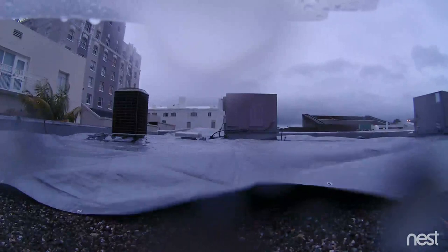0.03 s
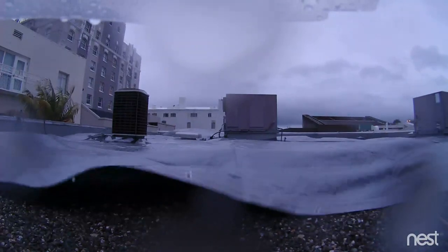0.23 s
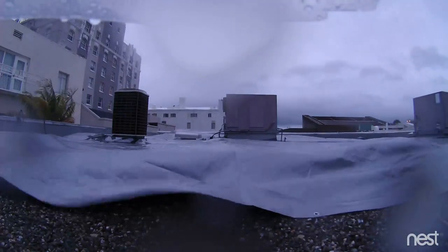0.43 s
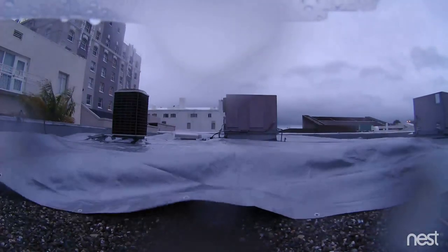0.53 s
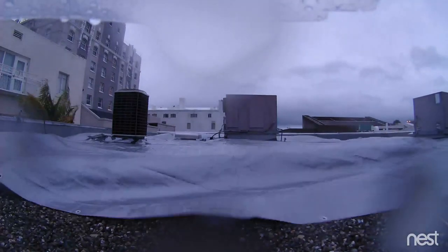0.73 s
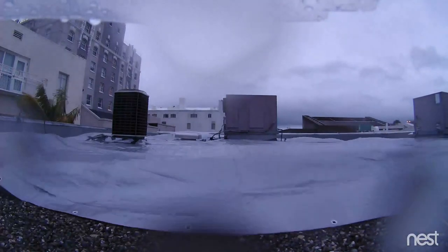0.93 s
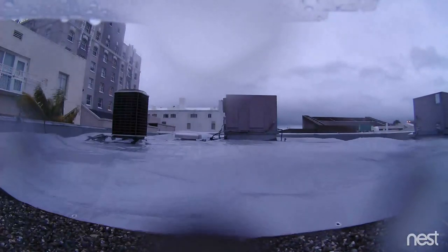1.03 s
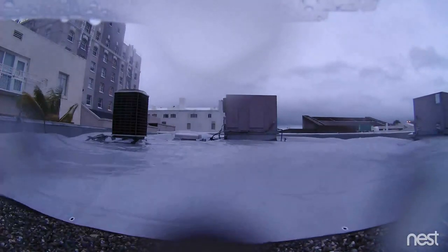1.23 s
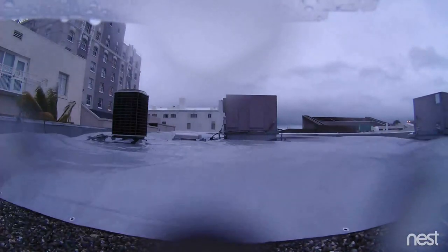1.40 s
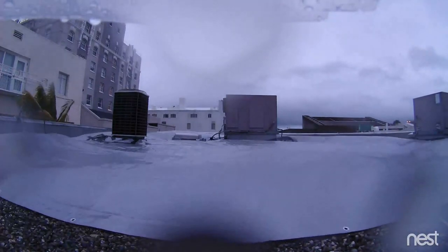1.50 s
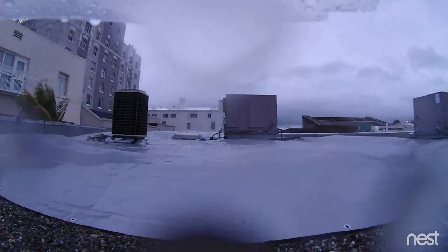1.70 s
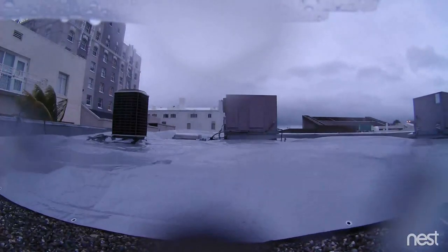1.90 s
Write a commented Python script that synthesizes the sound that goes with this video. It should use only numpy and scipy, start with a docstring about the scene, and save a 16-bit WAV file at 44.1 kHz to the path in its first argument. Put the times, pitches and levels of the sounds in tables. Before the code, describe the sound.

A large tarp flaps close by on a rooftop, with its loudest cluster of snaps from about 0.1 to 0.3 seconds. A second burst comes around 0.5 seconds, followed by lighter flaps until 0.9 and one more near 1.15. After 1.3 seconds it only flutters softly. Quieter gusty wind hisses and rumbles on the microphone throughout, with a few faint spatters.

```python
"""On a gravel roof, a large tarp billows in gusty, wet wind, close to a small outdoor camera.
Each flap is a swell of tiny crease pops that ring the sheet, with a louder snap where it pulls taut;
between flaps it flutters softly. The parapet and roof boxes return a short, dull echo.
Turbulent wind roars and hisses over the roofs and buffets the microphone; light spatters land nearby."""
import sys
import numpy as np
from scipy import signal
from scipy.fft import rfft, irfft
from scipy.io import wavfile
from scipy.ndimage import uniform_filter1d

SR = 44100
rng = np.random.default_rng(int(sys.argv[2]) if len(sys.argv) > 2 else 0)


def bounce(signal):
    """Save signal as a 16-bit WAV file at the path given by the first command-line argument."""
    frames = np.transpose(np.atleast_2d(signal))
    limited = np.clip(frames, -1, 1)
    pcm = np.round(limited * 32767).astype(np.int16)
    wavfile.write(sys.argv[1], SR, pcm)


N = 85995


def amp(db):
    """Amplitude ratio of a level in decibels."""
    return 10 ** (np.asarray(db) / 20)


def unit_rms(x):
    """Normalisation to unit mean power."""
    return x / np.sqrt(np.mean(x ** 2) + 1e-20)


def spectrum_db(points, hz):
    """Spectral level, interpolated on a logarithmic frequency axis."""
    f, db = np.transpose(points)
    return np.interp(np.log(hz + 1), np.log(f), db)


def envelope(rows, column=1):
    """Amplitude envelope from levels interpolated in time."""
    rows = np.array(rows)
    return amp(np.interp(np.arange(N) / SR, rows[:, 0], rows[:, column]))


def add(mix, onset, sound):
    """Superposition of a sound on the mix, from an onset in seconds."""
    start = round(onset * SR)
    part = mix[max(start, 0):max(start + len(sound), 0)]
    part += sound[max(-start, 0):][:len(part)]


def swell(peak, rise, fall, shape=1.78):
    """Growth and decay about a peak; rise and fall are the times between it and 1/e amplitude."""
    t = np.arange(N) / SR - peak
    return np.exp(-np.maximum(-t / max(rise, 1e-3), t / max(fall, 1e-3)) ** shape)


def crackle(clicks_per_s=1300, spread_db=2.5, air_gain=0.56):
    """Shot noise: independent clicks of uneven size, over the white noise of rushing air."""
    sizes = amp(spread_db * np.minimum(rng.exponential(1, N), 3)) * rng.choice([-1, 1], N)
    clicks = sizes * (rng.random(N) < clicks_per_s / SR)
    return unit_rms(clicks) + air_gain * rng.standard_normal(N)


def pop(bass_hz, treble_hz, bass_poles=3.26, treble_poles=4.14, size=4096):
    """Impulse response of the sheet: smaller folds have less bass, tauter cloth more treble."""
    # ring of the sheet: f/Hz, level/dB
    sheet_response = [(20, -19), (50, -4), (100, -5), (160, 1), (260, 2.5), (350, 2.5), (430, 1), (520, 1),
                      (860, 0.5), (1500, -0.5), (2300, 0.5), (3200, -3.5), (4200, -7.5), (7000, -2)]
    hz = abs(np.fft.fftfreq(size, 1 / SR)) + 1
    treble_loss = 1 + (hz / treble_hz) ** (2 * treble_poles)
    bass_loss = 1 + (bass_hz / hz) ** (2 * bass_poles)
    gain = amp(spectrum_db(sheet_response, hz)) / np.sqrt(treble_loss * bass_loss)
    minimum_phase = np.exp(np.conj(signal.hilbert(np.log(gain + 1e-5))))  # energy comes at the onset
    return np.fft.ifft(minimum_phase).real[:size // 2]


def creasing(bass_hz, treble_hz, window=500):
    """Source and filter: crease clicks convolved with the sheet's response, held at steady power."""
    pops = signal.oaconvolve(crackle(), pop(bass_hz, treble_hz))[:N]
    power = uniform_filter1d(uniform_filter1d(pops ** 2, window), window)
    return pops / np.sqrt(abs(power) + 1e-12)


def flutter():
    """Slow amplitude modulation of soft creasing: the sheet stirs between flaps."""
    # strength of the flutter: t/s, level/dB
    levels = [(0, -48.5), (.07, -60.5), (.28, -46), (.355, -71), (.44, -44.5), (.7, -49.5), (.8, -53.5),
              (.92, -58.5), (1.03, -74), (1.15, -49.5), (1.3, -58), (1.42, -55), (1.53, -61), (1.8, -60.5),
              (1.95, -58.5)]
    return envelope(levels) * creasing(bass_hz=225, treble_hz=576, window=2000)


def turbulence(spectrum, patch_db, flicker_db, size):
    """Random-phase noise whose spectrum drifts in patches while its overall level flickers."""
    hz, hop = np.fft.rfftfreq(size, 1 / SR), size // 4
    frames = N // hop + 5
    real, imag, drift = rng.standard_normal((3, frames, len(hz)))
    patches = unit_rms(uniform_filter1d(uniform_filter1d(drift, size=14, axis=0), size=7, axis=1))
    flicker = unit_rms(uniform_filter1d(rng.standard_normal(frames), size=4))[:, None]
    gain = amp(spectrum_db(spectrum, hz) + patch_db * patches + flicker_db * flicker)
    _, noise = signal.istft(((real + 1j * imag) * gain).T, nperseg=size, noverlap=size - hop)
    return unit_rms(noise[:N])


def wind():
    """Aerodynamic noise: turbulent air roars over the roofs and hisses close by."""
    # gusts: t/s, roar level/dB, hiss level/dB
    gusts = [(0, -48.5, -62), (.06, -56, -50.5), (.15, -49.5, -62.5), (.35, -54.5, -62.5),
             (.55, -54, -65.5), (.78, -54, -59.5), (.92, -59, -55), (1.02, -56.5, -61.5),
             (1.14, -50.5, -56.5), (1.28, -57, -54.5), (1.36, -57.5, -59.5), (1.5, -57, -61),
             (1.62, -54, -60.5), (1.72, -57, -59), (1.82, -51.5, -56.5), (1.95, -58.5, -61)]
    # spectrum of the roar: f/Hz, relative level/dB
    roar_spectrum = [(30, -70.5), (90, -19), (200, 1), (330, -3.5), (500, -9), (750, 1), (1050, -3.5),
                     (1400, -13), (2000, -8), (3000, -21), (7000, -54)]
    # spectrum of the hiss: f/Hz, relative level/dB
    hiss_spectrum = [(300, -16), (1200, 10), (2100, -2), (2800, 5.5), (3300, 2), (4600, 0.5), (6000, -3.5),
                     (7000, -8)]
    roar = turbulence(roar_spectrum, patch_db=2, flicker_db=2, size=2048)
    hiss = turbulence(hiss_spectrum, patch_db=2.8, flicker_db=1.03, size=512)
    return envelope(gusts, column=1) * roar + envelope(gusts, column=2) * hiss


def buffeting():
    """Pressure fluctuations of the wind on the microphone, heard as a low rumble."""
    # strength of the buffeting: t/s, level/dB
    levels = [(0, -64), (.06, -74), (.2, -54), (.27, -61), (.35, -75.5), (.47, -53.5), (.54, -63),
              (.65, -60), (.84, -78.5), (1.0, -89), (1.12, -63.5), (1.27, -72), (1.44, -70.5), (1.64, -95),
              (1.79, -92), (1.89, -73), (1.95, -88)]
    # spectrum of the rumble: f/Hz, relative level/dB
    spectrum = [(15, -20.5), (30, -0.5), (48, -11), (90, 0.5), (160, -0.5), (400, -49.5), (2000, -84.5)]
    gain = amp(spectrum_db(spectrum, np.fft.rfftfreq(N, 1 / SR)))
    rumble = irfft(rfft(rng.standard_normal(N)) * gain, N)
    return envelope(levels) * unit_rms(rumble)


def flaps():
    """Superposition of many crease pops, swelling and dying away with each billow."""
    # billows: peak t/s, rise/s, fall/s, level/dB, bass corner f/Hz, treble corner f/Hz
    billows = [(0.008, .015, 0.016, -51, 220, 800), (0.09, 0.0056, 0.013, -46.5, 170, 600),
               (0.115, 0.0061, 0.0049, -29.5, 257, 1150), (0.124, 0.012, 0.0092, -27, 238, 1050),
               (0.148, 0.0087, 0.0081, -29.5, 210, 1050), (0.199, 0.01, 0.011, -23.5, 258, 1400),
               (0.220, 0.011, 0.021, -26, 270, 954), (0.242, 0.012, 0.003, -25.5, 256.5, 1260),
               (0.258, 0.0062, 0.021, -39, 193, 790), (0.312, 0.0079, 0.01, -39, 177, 476),
               (0.400, 0.012, 0.018, -47, 219, 700), (0.439, 0.0062, 0.0076, -44, 220, 700),
               (0.474, 0.014, 0.0069, -26.5, 320, 1080), (0.493, 0.032, 0.011, -45, 220, 650),
               (0.529, 0.014, 0.033, -42, 241, 754), (0.558, 0.012, 0.0093, -30, 427, 1586),
               (0.574, .006, 0.02, -35, 424, 900), (0.63, 0.0044, 0.017, -43, 190, 705),
               (0.668, 0.0063, 0.0063, -37, 270, 880), (0.68, 0.0023, 0.015, -39.5, 220, 750),
               (0.720, 0.0065, 0.0061, -40, 194, 607), (0.747, 0.011, 0.0085, -41, 240, 780),
               (0.763, .007, 0.0095, -39, 220, 700), (0.852, .005, 0.0096, -39.5, 230, 860),
               (0.974, 0.036, 0.01, -53.5, 196, 490), (1.083, 0.02, 0.029, -45, 220, 594),
               (1.11, .008, 0.015, -39, 236, 730), (1.13, 0.012, 0.013, -40, 240, 650),
               (1.179, .006, 0.004, -33.5, 463, 610), (1.188, 0.0091, 0.0038, -28.5, 410, 640),
               (1.212, 0.023, 0.011, -45, 260, 620), (1.258, .005, 0.006, -46, 240, 650),
               (1.448, 0.003, 0.0075, -47.5, 196, 600), (1.477, 0.0038, 0.0088, -51.5, 202, 500),
               (1.897, 0.0025, .008, -45, 220, 650)]
    out = np.zeros(N)
    for peak, rise, fall, db, bass_hz, treble_hz in billows:
        out += amp(db) * swell(peak, rise, fall) * creasing(bass_hz, treble_hz)
    return out


def roof_echo(sheet, t60_s=0.13, cutoff_hz=1260, reflections_per_s=1500, size=12000):
    """Diffuse reflection from the parapet and roof boxes: a dull tail that decays exponentially."""
    t = np.arange(size) / SR
    reflections = rng.standard_normal(size) * (rng.random(size) < reflections_per_s / SR)
    reflections *= (t > .004) * amp(-60 * t / t60_s)  # none arrives in the first 4 ms
    lowpass = signal.butter(2, cutoff_hz, fs=SR, output="sos")
    tail = signal.sosfilt(lowpass, reflections / np.linalg.norm(reflections))
    return amp(-14.5) * signal.oaconvolve(sheet, tail)[:N]


def spatters():
    """Band-limited shot noise: spatters and light scrapes make brief, bright bursts of fine clicks."""
    # bursts: peak t/s, rise/s, fall/s, level/dB, centre f/Hz, half-width/octaves
    bursts = [(0.044, 0.016, 0.012, -51, 2000, 0.83), (0.064, .008, .012, -53.5, 1900, 0.19),
              (0.112, 0.013, .003, -52, 2940, 0.36), (0.188, 0.007, 0.005, -52, 3330, 0.63),
              (0.201, 0.0078, 0.0026, -42, 3090, 0.45), (0.24, 0.0083, 0.0049, -49.5, 2960, 0.55),
              (0.832, .003, 0.0034, -55, 3540, 1), (0.919, 0.011, 0.016, -53.5, 1950, 0.17),
              (1.114, 0.0037, 0.0073, -51.5, 3960, 0.76), (1.135, 0.0044, 0.0056, -51.5, 2810, 1),
              (1.293, .006, 0.0077, -69, 4500, .5), (1.611, 0.006, 0.02, -57, 4700, 0.93)]
    hz, out = np.fft.rfftfreq(N, 1 / SR), np.zeros(N)
    for peak, rise, fall, db, centre_hz, octaves in bursts:
        band = np.exp(-(np.log2((hz + 1) / centre_hz) / octaves) ** 2)
        clicks = unit_rms(irfft(rfft(crackle()) * band, N))
        out += amp(db) * swell(peak, rise, fall) * clicks
    return out


def snaps():
    """Impulsive excitation: the sheet radiates one pressure pulse each time it pulls taut."""
    # taut pulls: t/s, peak level/dB, bass corner f/Hz, treble corner f/Hz
    pulls = [(0.1110, -19.5, 450, 1580), (0.1234, -20, 400, 963), (0.1557, -23.5, 220, 1016),
             (0.196, -11.5, 380, 1097), (0.212, -13.5, 300, 1060), (0.2195, -13.5, 260, 1070),
             (0.241, -17.5, 290, 1400), (0.2553, -24, 240, 1150), (0.4298, -37.5, 260, 850),
             (0.4668, -20.5, 330, 1350), (0.47, -19, 420, 1100), (0.482, -20, 262, 950),
             (0.5076, -29.5, 600, 800), (0.5567, -16.5, 683, 1520), (0.5636, -23.5, 290, 1100),
             (0.5785, -21, 451, 910), (0.6245, -29, 200, 720), (0.6645, -30.5, 377, 900),
             (0.7323, -33, 330, 850), (0.7602, -28, 241, 750), (0.8487, -30, 300, 1120),
             (1.1100, -28, 300, 850), (1.1787, -24.5, 450, 610), (1.4403, -40, 274, 800)]
    out = np.zeros(N)
    for onset, db, bass_hz, treble_hz in pulls:
        pulse = pop(bass_hz, treble_hz)
        add(out, onset, -amp(db) * pulse / abs(pulse).max())
    return out


def scene():
    """Linear superposition of the tarp, its echo, the spatters and the wind in one channel."""
    tarp = flutter() + flaps() + snaps()
    return (tarp + roof_echo(tarp) + spatters() + wind() + buffeting())[None]


def record(dry):
    """Band limiting: the camera passes only sound below about 7100 Hz."""
    lowpass = signal.firwin(401, 7100, window=("kaiser", 8), fs=SR)
    return signal.oaconvolve(dry, lowpass[None], "same")


dry = scene()
out = record(dry)
bounce(out)
```